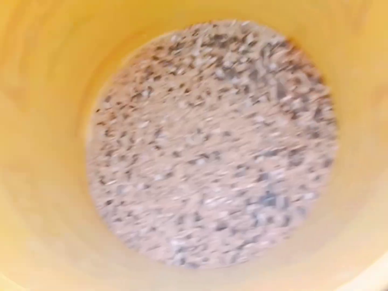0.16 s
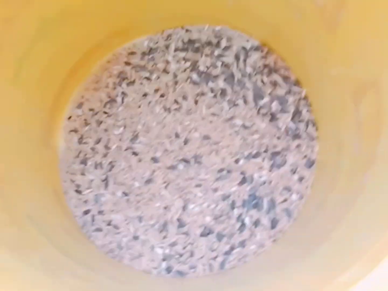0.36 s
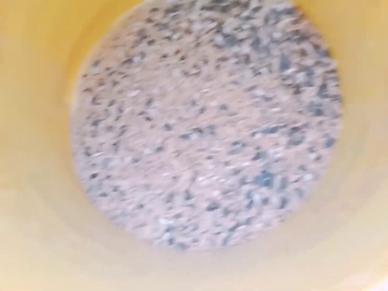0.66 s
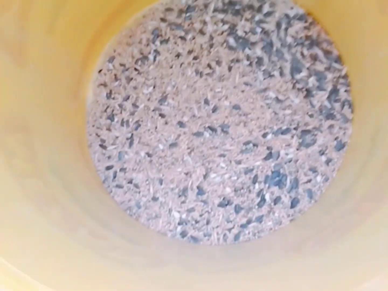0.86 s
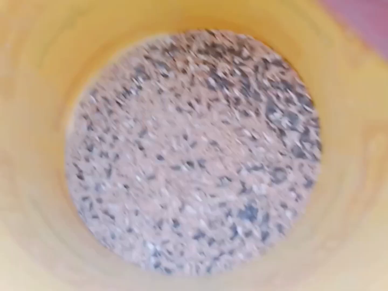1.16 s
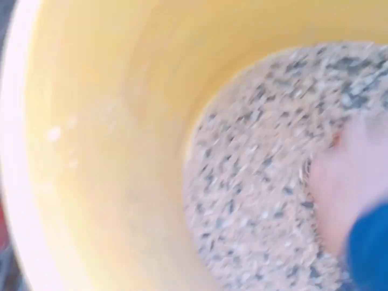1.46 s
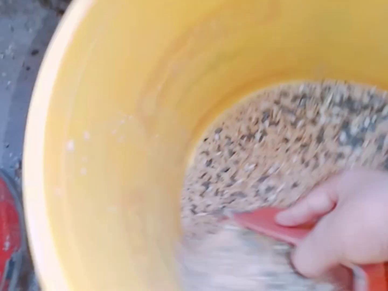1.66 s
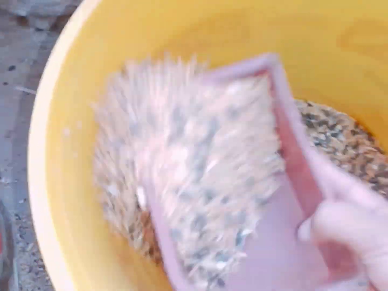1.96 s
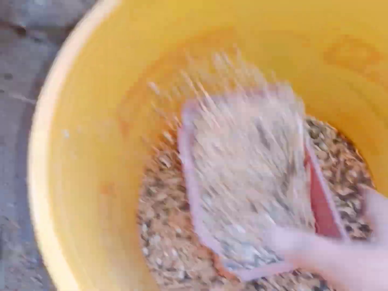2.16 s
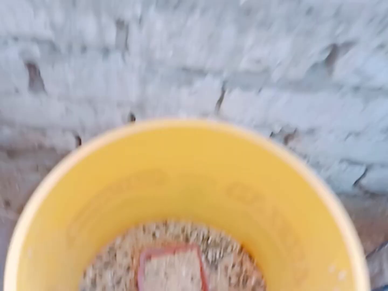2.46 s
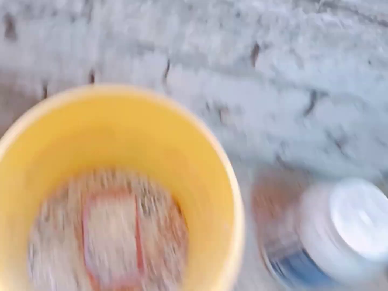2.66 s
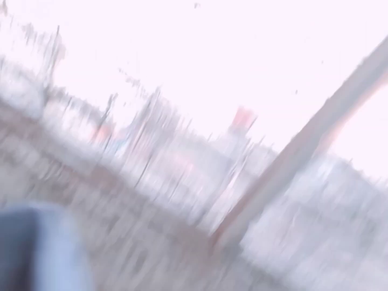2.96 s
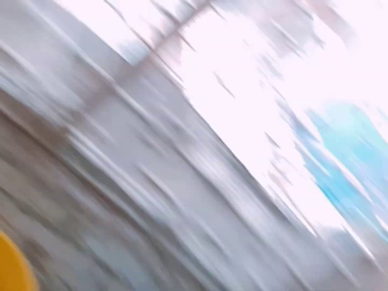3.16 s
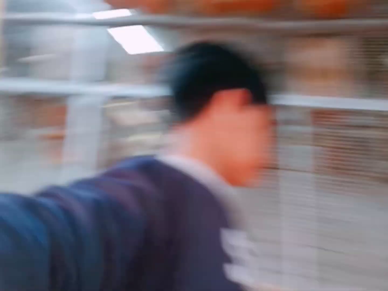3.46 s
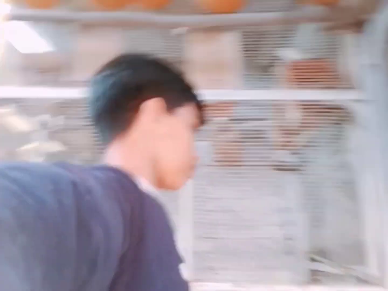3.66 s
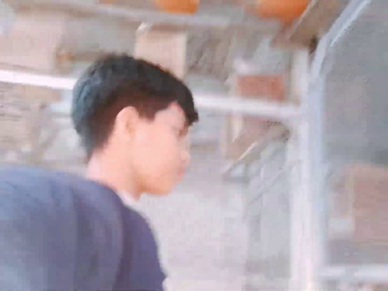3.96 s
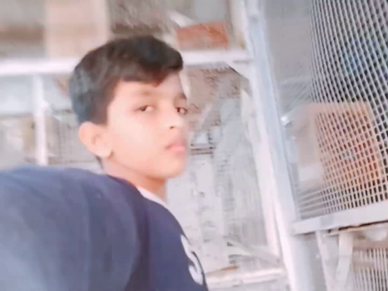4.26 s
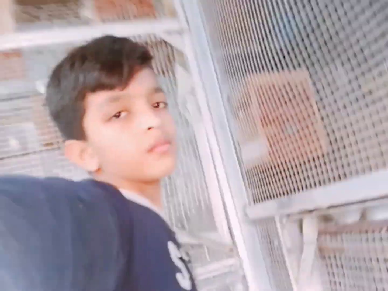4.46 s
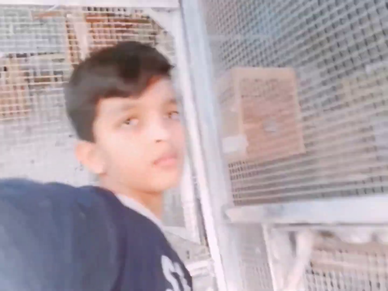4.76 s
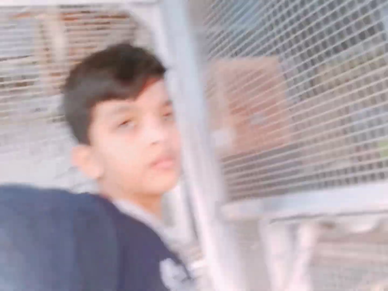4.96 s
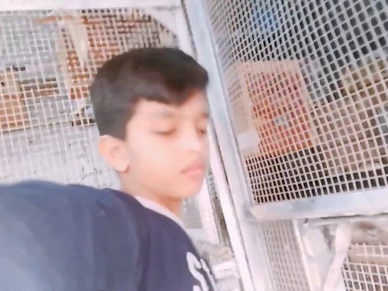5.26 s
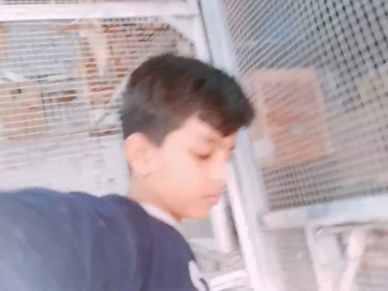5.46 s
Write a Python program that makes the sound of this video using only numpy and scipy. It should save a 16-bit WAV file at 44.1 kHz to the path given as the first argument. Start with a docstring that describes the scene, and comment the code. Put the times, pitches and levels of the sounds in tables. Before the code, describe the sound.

A scoop crunches into dry seed in a plastic bucket, pours it rattling, drops back, then small birds chirp raspily with fluttering rustles.

```python
"""Seed scoop and aviary

A scoop digs into seed in a plastic bucket, tips it out and drops back; then the microphone swings round to an aviary.
Seed is dense random clicks, partly exciting bucket resonances; ticks and knocks are decaying noise and sine.
Birds chirp in mostly falling, raspy notes: gliding, noise-modulated harmonics with decaying echoes from hard walls.
Wings and feet rustle as shaped noise; narrow noise bands form a low rumble and faint moans over a murmuring floor.
"""
import sys
import numpy as np
from scipy import signal
from scipy.fft import rfft, irfft, next_fast_len
from scipy.io import wavfile

SR = 44100
rng = np.random.default_rng(int(sys.argv[2]) if len(sys.argv) > 2 else 0)


def materialize(psi):
    """Save the field psi as 16-bit PCM at rate SR to the path in sys.argv[1].

    A 1-D psi becomes a single channel; in a 2-D psi each row is a channel.
    """
    bounded = np.clip(np.atleast_2d(psi).T, -1, 1)
    quanta = np.round(bounded * 32767).astype(np.int16)
    wavfile.write(sys.argv[1], SR, quanta)


N = 246959   # samples


# Moving seed, one list scooped and poured, one under the dropped scoop: time_s, patter_db, dull_grains_db
SEED_FLOW = [
    [(1.318, -43, -19.5), (1.35, -46, -26.5), (1.366, -15, -23), (1.39, -21.5, -23), (1.455, -23, -23.5),
     (1.49, -17, -21.5), (1.57, -25.5, -24), (1.674, -19.5, -20.5), (1.846, -27, -29), (1.966, -20, -25),
     (2.098, -21.5, -28), (2.284, -33.5, -43.5)],
    [(2.287, -14, -26), (2.328, -24, -31.5), (2.404, -28.5, -33), (2.52, -45, -58), (2.6, -45, -44)],
]
# Spectral density of the bright seed clicks: frequency_hz, density_db
PATTER_SPECTRUM = [(1760, -40), (3000, -7), (6300, -1.5), (7400, 2.5), (12600, -5.5), (15100, 1),
                   (16000, -1.5)]
# Spectral density of the duller seed clicks: frequency_hz, density_db
DULL_SPECTRUM = [(300, -59), (550, -17), (1500, -1.5), (2200, -3), (2900, 1.5), (4500, -2.5), (8000, -17.5)]
# Spectral density of the clicks that drive the bucket wall: frequency_hz, density_db
SHOVE_SPECTRUM = [(150, -2.5), (1000, 6), (3000, -19)]
# Resonant modes of the bucket wall: frequency_hz, width_hz, level_db
BUCKET_MODES = [(255, 33.5, 10), (653, 61, -5.5), (974, 52, -6), (1148, 52, -3), (1680, 34, -4)]
# Shoves that ring the wall harder: peak_s, level_db
SHOVES = [(1.328, -18.5), (1.418, -26), (1.565, -25.5), (1.595, -24.5), (1.622, -24), (1.69, -30),
          (2.098, -56.5), (2.3, -39.5)]
# Sharp ticks of husks and scoop: start_s, level_db, t60_s, left_minus_right_db
TICKS = [(0.406, -42.5, 0.06, 29), (0.519, -39, 0.028, 2), (0.655, -25, 0.018, 6),
         (0.7672, -24.5, 0.02, 15), (1.067, -28, 0.021, -6), (1.126, -21.5, 0.04, -4),
         (1.204, -33.5, 0.12, 9), (1.2835, -9, 0.062, 5), (1.3588, -3, 0.076, 3), (1.5362, -10, 0.05, 0),
         (2.2862, -10, 0.024, 7), (2.956, -34, 0.07, 25), (3.066, -25, 0.017, 33),
         (3.0772, -25.5, 0.013, 33), (3.622, -30, 0.23, -4), (3.6523, -31, 0.11, -5),
         (5.4165, -10.5, 0.51, 0)]
# Dull knocks: start_s, level_db, pitch_hz, cycles_to_60_db_decay (a count)
KNOCKS = [(1.328, -26, 301, 2.9), (1.411, -26, 705, 2.1), (1.54, -18, 651, 4.3), (1.591, -22, 716, 2.7),
          (1.617, -18, 765, 17), (2.287, -39, 770, 3.2), (2.957, -13, 490, 1.96), (3.063, -11, 320, 1.35),
          (3.077, -21, 695, 3.5)]
# Chirps that hold a note, slide, then die on the last note:
# start_s, hold_and_slide_s, tail_s, first_hz, last_hz, first_db, last_db, overtones_db
CHIRPS = [ (.004, .017, 0.011, 7070, 6860, -32, -15.5, -4), (0.018, 0.017, .12, 5900, 6460, -17, -29.5, -9),
          (.004, 0.0095, 0.011, 3640, 3400, -17, -34, -28),
          (.005, .039, 0.052, 2263, 2330, -37.5, -72, -30),
          (0.024, 0.084, 0.027, 4193, 3186, -40.5, -31.5, -31),
          (0.116, 0.038, 0.054, 3300, 2860, -43, -35.5, -35),
          (0.172, .049, 0.057, 4700, 4220, -34, -30, -3.5), (.233, .066, .05, 3430, 2633, -32, -36.5, -18),
          (.379, 0.032, 0.068, 1635, 1702, -48, -53, -17), (0.521, .1, .04, 3000, 2890, -57.5, -54.5, -34),
          (.73, 0.038, 0.044, 3100, 3030, -61, -58, -32), (.98, 0.053, 0.074, 2950, 2800, -56, -58.5, -27),
          (.86, 0.082, .1, 4200, 3690, -56.5, -57, -38), (1.21, 0.062, .021, 3050, 2500, -58, -51.5, -23),
          (2.567, 0.063, 0.019, 4160, 2480, -40.5, -35.5, -18),
          (2.694, 0.067, .04, 4300, 2617, -35, -34, -51), (2.78, 0.043, .03, 4500, 4000, -40, -46, -23),
          (3.018, .055, 0.029, 4250, 2816, -36.5, -47.5, -9.5),
          (3.133, 0.081, 0.03, 4230, 2627, -44.5, -42, -36),
          (3.361, 0.082, 0.066, 4080, 4130, -40, -37, -15.5),
          (3.452, 0.042, 0.072, 4120, 3950, -37.5, -40, -19),
          (3.459, 0.027, 0.11, 2890, 3330, -38.5, -41, -39), (3.465, 0.015, .11, 2160, 2057, -30, -54, -14),
          (3.647, 0.0076, 0.0073, 4350, 4200, -38, -30.5, -28),
          (3.67, 0.064, .07, 3950, 4080, -42.5, -40, -16), (3.734, 0.024, 0.08, 3700, 3122, -46, -41, -15),
          (3.865, .036, 0.081, 4280, 2434, -36, -23, -17),
          (3.884, 0.021, 0.033, 3160, 3020, -39, -28.5, -39),
          (4.012, .036, 0.05, 4360, 2379, -33, -23, -14.5),
          (4.173, 0.042, 0.064, 4120, 2475, -40, -24.5, -14),
          (4.192, 0.022, 0.031, 3163, 3210, -29, -30.5, -31),
          (4.352, .047, 0.096, 3960, 2844, -36, -27, -19.5),
          (4.541, 0.082, 0.078, 4135, 4185, -38.5, -32, -26),
          (4.571, .026, .055, 3300, 2491, -35, -28, -14), (4.62, 0.043, 0.069, 2780, 2950, -34, -38.5, -34),
          (4.65, 0.021, .027, 2270, 2000, -38, -41.5, -15), (4.72, 0.037, 0.033, 3325, 2560, -34, -26, -18),
          (4.731, .029, 0.017, 1846, 1497, -38, -39.5, -27),
          (4.807, 0.027, 0.036, 2530, 2927, -51, -33, -14), (4.894, 0.015, .028, 2710, 3025, -27, -32, -3),
          (4.948, 0.019, 0.047, 2605, 2830, -32.5, -30.5, 0),
          (5.02, 0.015, .057, 2940, 3016, -23.5, -30.5, 1), (5.1, 0.047, 0.047, 2893, 2795, -41, -41, -36),
          (5.35, 0.027, .022, 2900, 2590, -61, -39, -6), (5.504, .02, 0.054, 2690, 2583, -38, -38.5, -31), ]
# Colour added to the overtones: frequency_hz, gain_db
OVERTONE_COLOUR = [(3000, 20.5), (4900, 0), (5900, 0.5), (7500, 2), (9500, -15), (11700, -2.5),
                   (16000, -20)]
# Direction of the aviary as the microphone swings: time_s, left_minus_right_db
FACING = [(0.0, 5.5), (.7, 5.5), (2.6, 9.5), (2.82, 2), (3.0, 12.5), (3.2, 0.5), (3.9, -3), (4.2, -0.5),
          (5.6, -1)]
# Bursts of wings and feet: peak_s, hiss_db, body_db, rise_s, fall_s (the body stretches both times)
RUSTLE = [(0.0, -27, -73, .01, 0.15), (0.246, -28.5, -49.5, 0.24, 0.16), (.66, -51, -63, 0.28, 0.11),
          (0.77, -48.5, -70, 0.011, 0.2), (1.026, -48, -64, 0.061, 0.078), (2.6, -48, -56.5, 0.3, 0.31),
          (2.829, -29, -70, 0.067, 0.066), (3.058, -40, -45.5, 0.17, 0.073), (3.363, -51, -54.5, 0.14, 0.2),
          (3.659, -40, -51, 0.051, .1), (3.77, -47, -57, 0.13, 0.13), (3.912, -42.5, -46.5, 0.06, 0.094),
          (4.039, -31.5, -37, 0.015, 0.072), (4.219, -30, -34, 0.12, .095), (4.411, -37, -44, 0.058, 0.11),
          (4.604, -38.5, -46, 0.14, 0.14), (4.76, -36.5, -61, 0.1, 0.078), (4.9, -44, -67, 0.014, 0.31),
          (5.036, -39, -51.5, 0.23, 0.16), (5.4, -46.5, -51, 0.097, 0.022),
          (5.418, -29.5, -65, 0.0036, 0.067), (5.476, -29.5, -38, 0.088, 0.076)]
# Spectral density of the rustle's hiss: frequency_hz, density_db
HISS_SPECTRUM = [(880, -96), (1500, -19), (3690, 9), (4590, 0), (4970, -4.5), (7690, 6), (11400, -10),
                 (15200, -11), (16000, -4)]
# Spectral density of the rustle's softer body: frequency_hz, density_db
BODY_SPECTRUM = [(500, -9.5), (900, -4), (1400, 4.5), (2200, -0.5), (4000, -13)]
# Swells of the rumble: peak_s, lower_band_db, upper_band_db
RUMBLE_SWELLS = [(.32, -45, -46.5), (.669, -39.5, -37.5), (.85, -39, -55), (1.15, -40.5, -31.5),
                 (1.59, -46, -40), (1.97, -35.5, -40), (2.27, -58, -43), (2.48, -32.5, -36.5),
                 (2.85, -42, -40.5), (3.0, -35, -37.5), (3.45, -43, -45), (3.68, -73, -46.5),
                 (3.98, -56, -45.5), (4.18, -39.5, -50), (4.46, -52, -38), (4.65, -46.5, -64),
                 (4.88, -46.5, -50.5), (5.02, -57.5, -51), (5.5, -58, -51.5)]
# Centres of the two rumble bands: lower_hz, upper_hz
RUMBLE_HZ = (101.5, 139.3)
# Spectral density of the broad noise around the rumble bands: frequency_hz, density_db
SKIRT_SPECTRUM = [(25, -65), (50, -6.0), (100, -4), (170, -0.5), (260, -22.5), (1200, -45.5)]
# Faint gliding moans: start_s, length_s, first_hz, last_hz, level_db
MOANS = [(1.119, 0.17, 435, 282, -53.5), (3.62, 0.23, 149.2, 250, -48.5), (3.86, .2, 397, 482, -52.5)]
# Spectral density of the background murmur: frequency_hz, density_db
FLOOR_SPECTRUM = [(15, -66), (25, -15), (108, 4.5), (166, -2.5), (270, -10.5), (1160, -20.5), (2000, -40),
                  (2910, -8.5), (3430, -32), (3920, -5), (4870, -57), (5570, -24), (7710, -16.5),
                  (13600, -141.5), (16000, -66)]
# Likeness of left and right noise: frequency_hz, likeness (0 to 1)
LIKENESS = [(60, 1), (240, 0.87), (950, 0.2), (3770, 0.0099), (15000, 0.011)]

DIG_START_S, DIG_END_S, DIG_DB, DIG_RELEASE_S = 1.318, 1.765, -36, 0.052
SHOVE_RISE_S, SHOVE_FALL_S = 0.026, 0.07
SEED_PAN_DB = 2.5   # left minus right
HOLD_SHARE, LONGEST_HOLD_S = 0.35, 0.02   # first note's share of the hold and slide; upper limit
ONSET_S = 0.012   # longest fade-in of a chirp
RASP_HZ = 248   # flutter bandwidth of the fundamental
AVIARY_T60_S, AVIARY_DB = 0.24, -1
RUMBLE_RISE_S, RUMBLE_FALL_S = 0.24, 0.18
SWELL_DB = 25   # climb of a swell in its rise time and drop in its fall time
FLOOR_DB = -49
BASS_LEAN_DB = -5.5   # left minus right, weighted by likeness in noise
CUTOFF_HZ = 16400   # stopband edge, 60 dB down


def bucket():
    """Modal resonance: a plastic wall rings at its own frequencies when moving seed excites it."""
    push = colour(grains(900, spread_db=4.0), SHOVE_SPECTRUM)
    modes = 0
    for hz, width_hz, db in BUCKET_MODES:
        # dividing by root bandwidth offsets the greater noise power of a wide mode
        modes = modes + amp(db) * resonate(push, hz, width_hz) / np.sqrt(width_hz)
    blurred = resonate(push, 440, 640)   # many weak modes blur together
    wall = rms_one(modes) + 0.5 * rms_one(blurred)
    t = np.arange(N) / SR
    # the wall drones steadily during the dig, then decays
    drone = amp(DIG_DB - SWELL_DB * np.maximum(t - DIG_END_S, 0) / DIG_RELEASE_S)
    shoves = swells([(s, db, SHOVE_RISE_S, SHOVE_FALL_S) for s, db in SHOVES])
    return (t > DIG_START_S) * (drone + shoves) * wall


def seed():
    """Granular impact noise: dense seed clicks fuse into patter, while heavier shoves ring the bucket."""
    patter = patches(colour(grains(6000, spread_db=1.5), PATTER_SPECTRUM), patchy_db=0.5, rate_hz=14)
    patter = patter * amp(2.5 + 0.99 * wander(28))
    dull = patches(colour(grains(3000, spread_db=2.0), DULL_SPECTRUM), patchy_db=3.0, rate_hz=14.5)
    dull = dull * amp(1.5)
    out = bucket()
    for rows in SEED_FLOW:
        gate, patter_db, dull_db = in_time(rows)
        flow = amp(patter_db) * patter + amp(dull_db) * dull
        out = out + gate * flow * sides(SEED_PAN_DB)[:, None]
    return out


def ticks():
    """Transient radiation: a hard contact gives a crack with a short decaying spray of noise."""
    size = 8000
    out = np.zeros((2, N + size))
    t = np.arange(size) / SR
    for s, db, t60, pan_db in TICKS:
        crack = 0.23 * amp(-60 * t / 0.006)
        decay = 0.29 * amp(-60 * t / max(t60, 0.005))
        spray = rng.standard_normal((2, size)) * (crack + decay)
        start = round(s * SR)
        out[:, start:start + size] += amp(db) * spray * sides(pan_db)[:, None]
    high_pass = signal.butter(2, 1800, "high", fs=SR, output="sos")
    return signal.sosfilt(high_pass, out[:, :N])


def knocks():
    """Damped oscillation: a blunt blow excites a ring that decays over a set number of cycles."""
    size = 4000
    out = np.zeros(N + size)
    t = np.arange(size) / SR
    for s, db, hz, cycles in KNOCKS:
        start = round(s * SR)
        out[start:start + size] += amp(db - 60 * t * hz / cycles) * np.sin(2 * np.pi * hz * t)
    return out[:N] * sides(-3.5)[:, None]


def birds(purity, throb_db, throb_hz, break_db, gain_db):
    """Harmonic voicing: gliding partials throb, weaken in mid slide and flutter, with other noise at each side."""
    out = np.zeros((2, N))
    for s, glide, tail, first_hz, last_hz, first_db, last_db, over_db in CHIRPS:
        hold = min(HOLD_SHARE * glide, LONGEST_HOLD_S)
        slide = glide - hold
        knots = s + np.cumsum([0, hold, slide, tail])
        at = np.arange(int(s * SR), min(int(knots[-1] * SR), N))
        t = at / SR
        hz = np.interp(t, knots, [first_hz, first_hz, last_hz, last_hz])
        # the last note keeps its level for a fifth of the tail before it dies
        level_knots = np.insert(knots, 3, knots[2] + 0.2 * tail)
        level_db = np.interp(t, level_knots, [first_db - 0.5, first_db, last_db, last_db, last_db - 35.5])
        level_db += throb_db * wander(throb_hz, size=len(at))[0]
        sliding = np.sin(np.pi * np.clip((t - knots[1]) / slide, 0, 1))
        level_db -= break_db * sliding * abs(np.log2(first_hz / last_hz))   # wide slides lose voice
        tone = partials(hz, level_db, over_db, purity)
        pan_db = np.interp(s, *np.transpose(FACING))
        onset = np.minimum((t - s) / min(ONSET_S, glide), 1)
        out[:, at] += tone * sides(pan_db)[:, None] * onset
    return amp(gain_db) * out


def partials(hz, level_db, over_db, purity):
    """Harmonic series: five partials follow one pitch, each broadened by random modulation."""
    phase = 2 * np.pi * np.cumsum(hz) / SR
    tone = 0
    for k in range(1, 6):
        db = level_db
        if k > 1:
            db = level_db + over_db + at_hz(OVERTONE_COLOUR, k * hz)
        a, b = flutter(RASP_HZ * k ** 0.7, size=len(hz))   # flutter widens with partial number
        turn = k * phase + rng.uniform(0, 2 * np.pi, (2, 1))
        wave = (purity + a) * np.sin(turn) + b * np.cos(turn)
        tone = tone + amp(db) * (k * hz < 16000) * wave
    return tone


def aviary(x):
    """Reverberation: dense reflections off walls and mesh decay exponentially, unrelated at each side."""
    t = np.arange(int(0.5 * SR)) / SR
    decay = amp(-60 * t / AVIARY_T60_S) * (t > 0.004)
    echoes = rng.standard_normal((2, len(t))) * decay
    echoes /= np.sqrt(np.sum(echoes ** 2, axis=1, keepdims=True))
    return x + amp(AVIARY_DB) * signal.fftconvolve(x, echoes, axes=1)[:, :N]


def rustle():
    """Friction noise: feathers and grit give fine grains in a flickering hiss, with a softer body below."""
    hiss = patches(colour(grains(8000, spread_db=1.0), HISS_SPECTRUM), patchy_db=3.5, rate_hz=20.6)
    hiss = hiss * amp(2.0 * wander(39) + 6.0)
    body = colour(rng.standard_normal((2, N)), BODY_SPECTRUM) * amp(2.0 * wander(21))
    hiss_gain = swells([(s, db, rise, fall) for s, db, _, rise, fall in RUSTLE])
    # the body builds and dies more slowly than the hiss
    body_gain = swells([(s, db, 1.26 * rise, 1.66 * fall) for s, _, db, rise, fall in RUSTLE])
    return sides(in_time(FACING)[1]) * (hiss_gain * hiss + body_gain * body)


def rumble():
    """Narrow-band noise: two slowly modulated carriers with broad skirts swell, nearly alike at both sides."""
    out = 0
    for band, hz in enumerate(RUMBLE_HZ):
        gain = swells([(s, db[band], RUMBLE_RISE_S, RUMBLE_FALL_S) for s, *db in RUMBLE_SWELLS])
        turn = np.exp(2j * np.pi * hz * np.arange(N) / SR)
        a, b, c, d = wander(9.6, channels=4)
        mid = np.real((a + 1j * b + 0.42) * turn)
        side = np.real((c + 1j * d) * turn)
        core = (mid + 0.13 * side * [[1], [-1]]) * sides(-1.8)[:, None]
        skirt = colour(rng.standard_normal((2, N)), SKIRT_SPECTRUM)
        out = out + gain * (core + 0.5 * skirt)
    return out


def moans():
    """Modulated glide: random modulation broadens a sliding tone that swells and fades."""
    out = np.zeros((2, N))
    for s, length, first_hz, last_hz, db in MOANS:
        at = np.arange(int(s * SR), int((s + length) * SR))
        along = (at / SR - s) / length
        turn = 2 * np.pi * np.cumsum(first_hz + (last_hz - first_hz) * along) / SR
        a, b = flutter(26, size=len(at))
        wave = (0.76 + a[0]) * np.sin(turn) + b[0] * np.cos(turn)
        out[:, at] += amp(db) * np.sin(np.pi * along) * wave
    return out * sides(BASS_LEAN_DB)[:, None]


def murmur():
    """Ambient noise: the far murmur of the yard and its birds is coloured noise with shifting bands."""
    noise = colour(rng.standard_normal((2, N)), FLOOR_SPECTRUM)
    return amp(FLOOR_DB) * patches(noise, patchy_db=5.0, rate_hz=6.7)


def amp(db):
    """Logarithmic level: decibels to amplitude gain."""
    return 10 ** (np.asarray(db) / 20)


def rms_one(x):
    """Power normalisation: scale to rms 1."""
    return x / np.sqrt(np.mean(x ** 2) + 1e-20)


def in_time(rows):
    """Piecewise-linear envelopes: a gate over the table's span, then its columns joined by lines."""
    s, *columns = np.transpose(rows)
    t = np.arange(N) / SR
    gate = np.clip(np.minimum(t - s[0], s[-1] - t) / 0.002 + 0.5, 0, 1)
    return [gate] + [np.interp(t, s, column) for column in columns]


def swells(rows):
    """Exponential growth and decay: sum the gains of swells (peak_s, level_db, rise_s, fall_s)."""
    t = np.arange(N) / SR
    gain = 0
    for s, db, rise, fall in rows:
        away = np.maximum((s - t) / max(rise, 0.001), (t - s) / max(fall, 0.001))
        gain = gain + amp(db - SWELL_DB * away)
    return gain


def sides(pan_db):
    """Interaural level difference: left and right gains from left minus right in dB."""
    return amp(np.array([pan_db / 2, -pan_db / 2]))


def at_hz(points, hz):
    """Logarithmic frequency scale: read a spectrum between its points."""
    table_hz, values = np.array(points).T
    return np.interp(np.log(hz), np.log(table_hz), values)


def wander(hz, size=N, channels=1):
    """Low-pass random process: noise through two equal one-pole filters, scaled to rms 1."""
    r = np.exp(-2 * np.pi * hz / SR)
    noise = rng.standard_normal((channels, size + 4000))
    return rms_one(signal.lfilter([1], [1, -2 * r, r * r], noise)[:, 4000:])   # settled part only


def flutter(hz, size):
    """Band-limited modulation: two stereo noises with a steep upper edge, scaled to rms 1."""
    edge = signal.butter(4, np.clip(hz, 20, 5000), fs=SR, output="sos")
    noise = rng.standard_normal((4, size + 1500))
    return rms_one(signal.sosfilt(edge, noise)[:, 1500:]).reshape(2, 2, -1)


def grains(per_s, spread_db):
    """Random impulse process: two unrelated trains of clicks of uneven size and sign."""
    sizes = amp(spread_db * np.minimum(rng.exponential(1, (2, N)), 5))
    signs = rng.choice([-1, 1], (2, N))
    return sizes * signs * (rng.random((2, N)) < per_s / SR)


def colour(pair, spectrum):
    """Spectral shaping and coherence: make a stereo pair from two unrelated signals, rms 1."""
    size = next_fast_len(N)
    hz = np.maximum(np.arange(size // 2 + 1) * SR / size, 10)
    mid, side = rfft(pair, size) * amp(at_hz(spectrum, hz))
    alike = np.clip(at_hz(LIKENESS, hz), 0, 1)
    both = np.sqrt(1 + alike) * mid + np.sqrt(1 - alike) * side * [[1], [-1]]
    return rms_one(irfft(both * sides(BASS_LEAN_DB * alike), size)[:, :N])


def patches(pair, patchy_db, rate_hz, count=14):
    """Band-wise modulation: overlapping bands swell and fade independently, shifting the colour."""
    size = next_fast_len(N)
    hz = np.maximum(np.arange(size // 2 + 1) * SR / size, 200)
    place = np.log(hz / 200) / np.log(80) * (count - 1)   # bands spaced evenly in log frequency
    place = np.minimum(place, count - 1)
    whole = rfft(pair, size)
    gains = amp(patchy_db * wander(rate_hz, channels=count))
    out = 0
    for k, gain in enumerate(gains):
        band = np.clip(1 - abs(place - k), 0, 1)
        out = out + gain * irfft(whole * band, size)[:, :N]
    return rms_one(out)


def resonate(x, hz, width_hz):
    """Simple resonance: a two-pole filter of gain about 1 at its peak."""
    r = np.exp(-np.pi * width_hz / SR)
    zeros = np.array([1, 0, -1]) * (1 - r * r) / 2
    poles = [1, -2 * r * np.cos(2 * np.pi * hz / SR), r * r]
    return signal.lfilter(zeros, poles, x)


def scene():
    """Superposition: all sources add, with echoes on the birds alone."""
    calls = aviary(birds(purity=1.52, throb_db=2.5, throb_hz=70, break_db=3.5, gain_db=1.0))
    return seed() + ticks() + knocks() + calls + rustle() + rumble() + moans() + murmur()


def record(dry):
    """Saturation and band limiting: peaks are rounded, then the top is cut steeply."""
    rounded = 0.95 * np.tanh(dry / 0.95)
    low_pass = signal.cheby2(12, 60, CUTOFF_HZ, fs=SR, output="sos")
    return signal.sosfilt(low_pass, rounded)


dry = scene()
out = record(dry)
materialize(out)
```